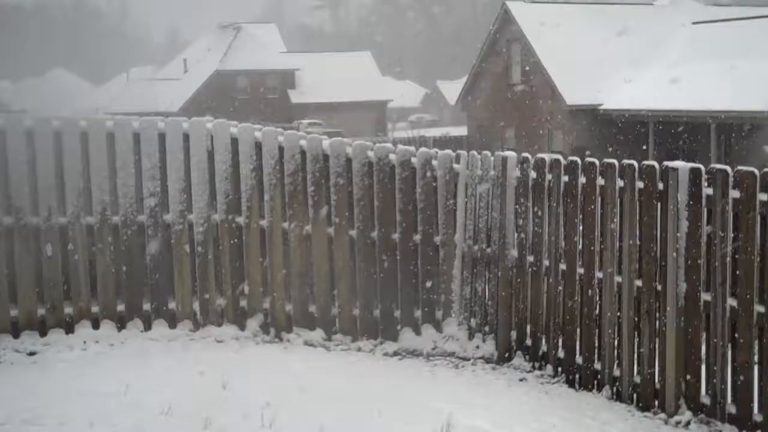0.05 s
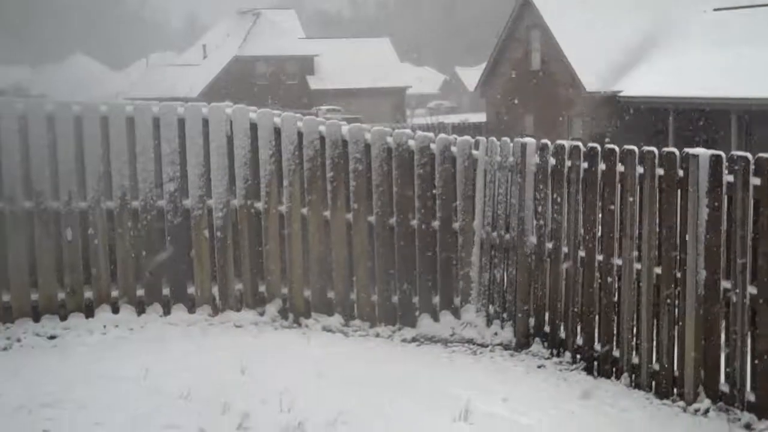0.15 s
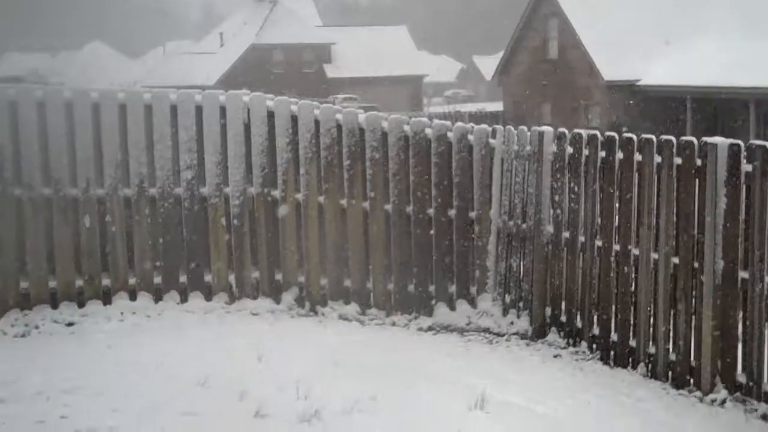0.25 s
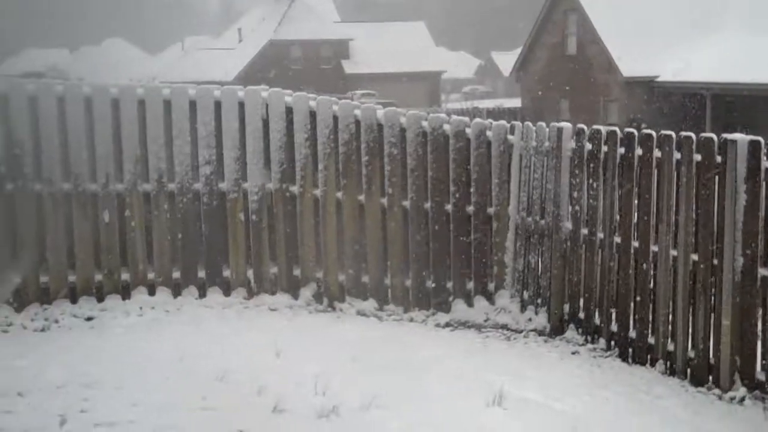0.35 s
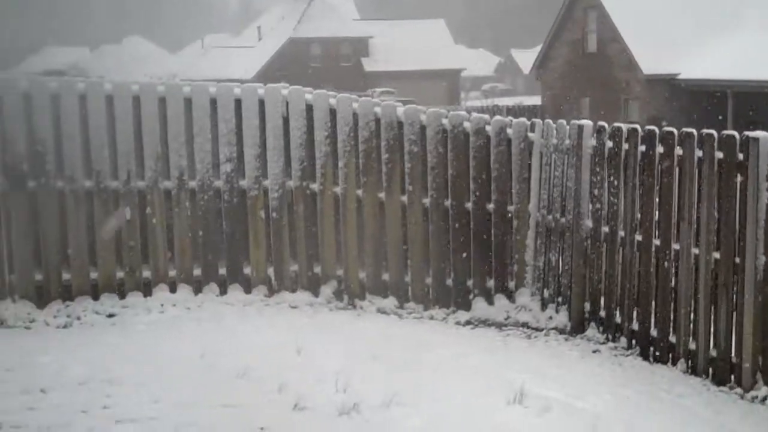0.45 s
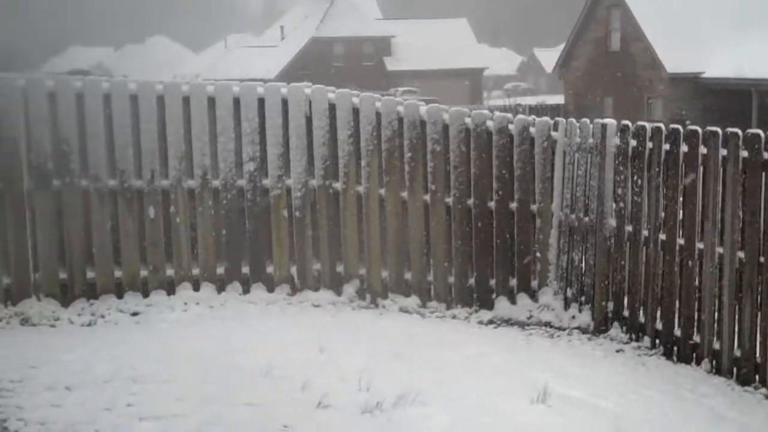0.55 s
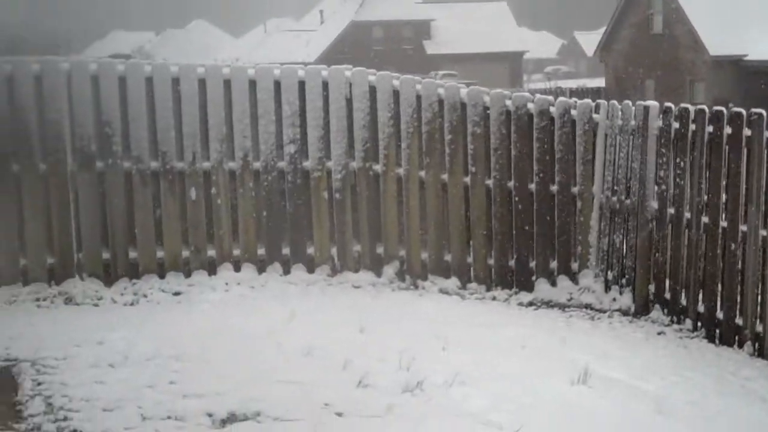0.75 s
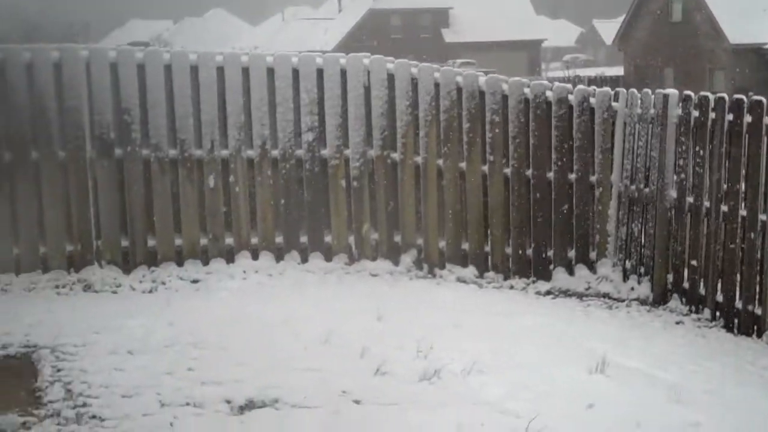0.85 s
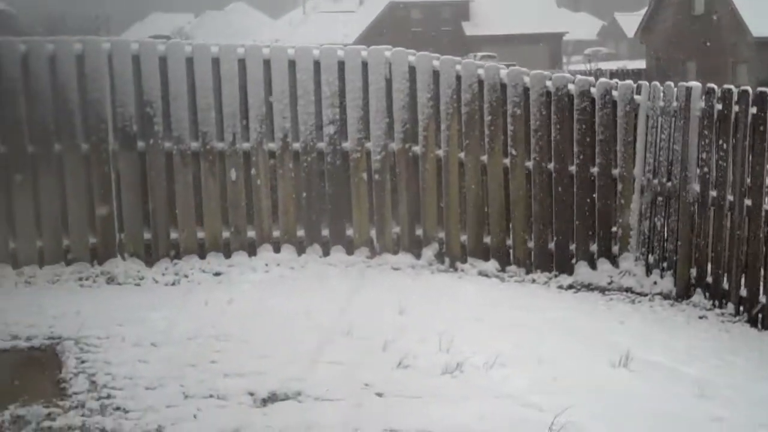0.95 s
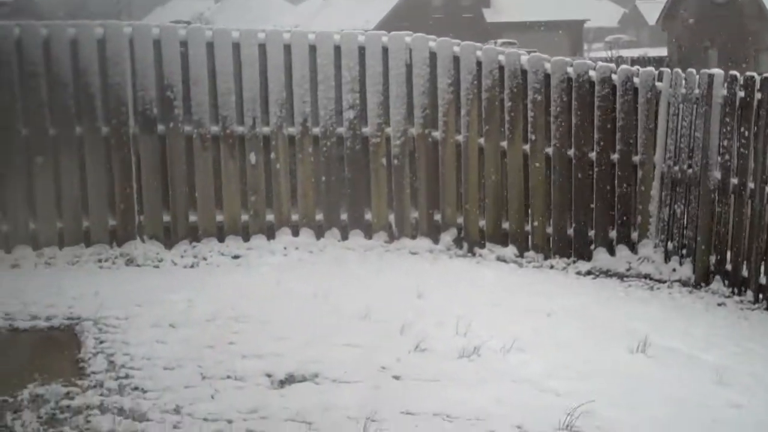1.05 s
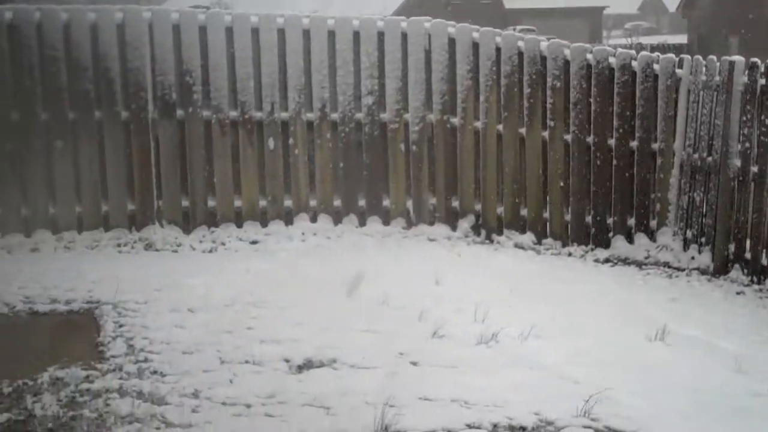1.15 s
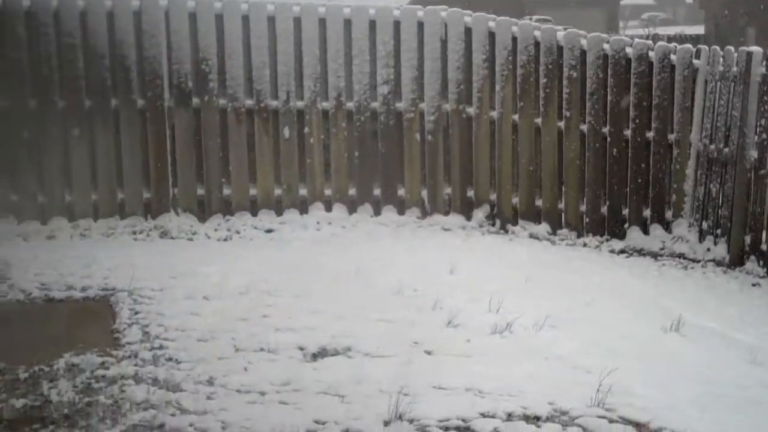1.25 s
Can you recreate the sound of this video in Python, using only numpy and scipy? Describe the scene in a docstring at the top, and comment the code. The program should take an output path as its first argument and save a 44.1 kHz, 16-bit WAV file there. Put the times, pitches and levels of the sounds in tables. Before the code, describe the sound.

Gusty wind buffets the microphone with an uneven low rumble over a faint outdoor hiss.

```python
"""Gusty wind buffets the microphone of a hand-held camera in a snowy yard.
Eddies roll over the port as a lumpy rumble that turns to a rough flutter as the gust grows;
soft ones thump the port and the sharpest slap it. Behind the wind sit a dull murmur of air,
a thin hiss, tiny ticks (probably snowflakes on the case), and faint rustles and one light
knock (probably the hand on the case)."""
import sys
import numpy as np
from scipy import signal
from scipy.fft import rfft, irfft, next_fast_len
from scipy.io import wavfile
from scipy.ndimage import uniform_filter1d, map_coordinates

SR = 44100
rng = np.random.default_rng(int(sys.argv[2]) if len(sys.argv) > 2 else 0)


def inscribe(sig):
    """Save sig as 16-bit PCM at rate SR to the path in sys.argv[1].

    A 1-D sig is mono; a 2-D sig holds one channel per row.
    Samples are clipped to [-1, 1] before scaling.
    """
    pcm = np.round(np.clip(np.atleast_2d(sig).T, -1, 1) * 32767)
    wavfile.write(sys.argv[1], SR, pcm.astype(np.int16))


N = 57330  # 1.3 s


def amp(db):
    """Decibels to gain."""
    return 10 ** (np.asarray(db) / 20)


def unit(x):
    """Scale to rms 1."""
    return x / np.sqrt(np.mean(x ** 2) + 1e-20)


def along(points, hz):
    """Read a curve of (freq_hz, value) points on a log frequency axis."""
    freqs, values = np.transpose(points)
    return np.interp(np.log(hz + 1), np.log(freqs + 1), values)


def wobble(rate):
    """A smooth random curve with `rate` knots a second."""
    return map_coordinates(rng.standard_normal(4096), [np.arange(N) * rate / SR], mode="wrap")


def filtered(x, response):
    """Equalise x with a gain given as a function of frequency."""
    size = next_fast_len(N + SR // 2)
    return irfft(rfft(x, size) * response(np.fft.rfftfreq(size, 1 / SR)), size)[:N]


def noise(spectrum):
    """Coloured noise of rms 1."""
    return unit(filtered(rng.standard_normal(N), lambda hz: amp(along(spectrum, hz))))


def low_pass(x, hz):
    """Roll off the treble at 18 dB an octave."""
    return signal.lfilter(*signal.butter(3, hz, fs=SR), x)


def impulse(spectrum, size=2048):
    """The minimum-phase click that has this spectrum."""
    cepstrum = irfft(np.log(amp(along(spectrum, np.fft.rfftfreq(size, 1 / SR)))))
    cepstrum[1:size // 2] *= 2
    cepstrum[size // 2 + 1:] = 0
    return irfft(np.exp(rfft(cepstrum)))


def add(track, start_s, sound, peak_db):
    """Mix a sound in at start_s, peaking at peak_db."""
    part = track[max(round(start_s * SR), 0):][:len(sound)]
    part += amp(peak_db) * sound[:len(part)] / np.abs(sound).max()


def yard(air_db=-58, hiss_db=-69, waver_db=1):
    """The bed: quiet distant air under a thin, slightly wavering hiss."""
    # dull murmur of outdoor air: freq_hz, level_db
    air_spectrum = [(15, -36), (25, -15), (32, 4), (81, 0.5), (408, -1.5), (948, -1), (1320, -5.5),
                    (1420, -8.5), (1560, -5), (1690, -5.5), (1830, -9.5), (5000, -27.5), (6500, -27.5),
                    (11000, -120)]
    # thin hiss: freq_hz, level_db
    hiss_spectrum = [(200, -7), (3000, 5), (6000, -2), (10000, 2), (13500, -5.5), (15000, -8)]
    air = amp(air_db) * noise(air_spectrum)
    hiss = amp(hiss_db + waver_db * wobble(rate=16.7)) * noise(hiss_spectrum)
    return air + hiss


def rustles(grain_db=3):
    """Brief grainy swells of treble, probably the hand on the case."""
    # faint swells: centre_s, level_db, half_width_s
    swells = [(0.407, -69.5, 0.026), (.53, -68, 0.076), (0.822, -65.5, 0.02), (.865, -75, 0.014),
              (1.186, -63.5, 0.019), (1.28, -69.5, 0.041)]
    # bright rustle tone: freq_hz, level_db
    spectrum = [(500, -8), (3000, -5), (7000, -1.5), (12000, -4), (15000, -12)]
    t = np.arange(N) / SR
    envelope = sum(amp(level_db) * np.exp(-((t - centre_s) / half_width_s) ** 2)
                   for centre_s, level_db, half_width_s in swells)
    grain = amp(grain_db * wobble(rate=700))
    return envelope * unit(grain * noise(spectrum))


def flakes(decay_s=0.001, trim_db=8):
    """Tiny dry ticks, probably snowflakes landing on the case."""
    # ticks: start_s, peak_db (before trim)
    ticks = [(.316, -59), (0.356, -56.5), (.401, -52.5), (0.447, -51), (.483, -51), (.514, -49.5),
             (0.519, -52.5), (.547, -50), (0.553, -50.5), (.626, -54), (.721, -60), (.86, -56), (.869, -55),
             (0.908, -55), (0.933, -51)]
    # crisp tick tone: freq_hz, level_db
    spectrum = [(500, -32), (3000, -1.5), (7000, -2.5), (11000, 5), (14000, 0.5)]
    out, click = np.zeros(N), impulse(spectrum)
    t = np.arange(SR // 100) / SR
    for start_s, peak_db in ticks:
        burst = rng.standard_normal(len(t)) * np.exp(-t / decay_s)
        add(out, start_s, signal.fftconvolve(burst, click), peak_db + trim_db)
    return out


def knock(start_s=0.9312, peak_db=-31):
    """One light, dead knock, probably a finger on the case."""
    # damped resonances of the case: pitch_hz, level_db, t60_s
    modes = [(770, -11, 0.0083), (1230, 11.5, 0.011), (1620, -4, 0.031)]
    out = np.zeros(N)
    t = np.arange(SR // 25) / SR
    ring = sum(amp(level_db - 60 * t / t60_s) * np.sin(2 * np.pi * pitch_hz * t)
               for pitch_hz, level_db, t60_s in modes)
    add(out, start_s, low_pass(ring, hz=1700), peak_db)
    return out


def puffs(half_width_cycles=1.0, trim_db=-1.5):
    """Each soft eddy thumps the port, swinging the pressure back and forth once or twice."""
    # soft eddies: centre_s, peak_db (before trim), pitch_hz
    eddies = [(.14, -36, 186), (0.176, -33.5, 181), (0.288, -20, 270), (.312, -18.5, 173), (.325, -17, 312),
              (.34, -23.5, 294), (0.398, -18, 313), (0.533, -25, 188), (.553, -29.5, 384),
              (0.564, -21.5, 222), (0.636, -29.5, 165), (0.691, -24.5, 154), (.76, -19.5, 540),
              (.777, -25, 456), (.795, -26.5, 430), (.81, -21.5, 385), (.862, -33, 480), (0.867, -30, 330),
              (.895, -30.5, 513), (.953, -33.5, 335), (1.001, -36, 270), (1.012, -30, 302),
              (1.12, -36.5, 410), (1.17, -33, 424), (1.278, -29.5, 153)]
    out = np.zeros(N)
    t = np.arange(-SR // 40, SR // 40) / SR
    for centre_s, peak_db, pitch_hz in eddies:
        swing = np.sin(2 * np.pi * (pitch_hz * t + rng.random()))
        envelope = np.exp(-(pitch_hz * t / half_width_cycles) ** 2)
        add(out, centre_s + t[0], swing * envelope, peak_db + trim_db)
    return out


def slaps(band_ratio=7, trim_db=-2):
    """Each sharp eddy slaps the port: one pressure jolt in a few milliseconds of tearing air."""
    # sharp eddies: centre_s, peak_db (before trim), half_width_s, upper_edge_hz
    eddies = [(.226, -29, 0.0017, 1970), (0.268, -20, 0.0039, 2540), (0.277, -22, 0.0019, 2130),
              (.286, -17.5, 0.003, 5200), (0.296, -14, 0.0011, 1620), (0.307, -23, 0.0023, 2580),
              (0.317, -22.5, 0.01, 2180), (.336, -21.5, 0.0026, 2260), (0.356, -20, 0.0028, 1780),
              (0.414, -16.5, .005, 2560), (0.429, -23, 0.0021, 2700), (.452, -18, 0.0054, 2780),
              (0.474, -21, 0.0013, 1400), (0.5, -35, 0.0014, 1400), (0.528, -29, 0.0011, 1100),
              (0.546, -19.5, .0025, 1400), (.552, -22.5, 0.0055, 1420), (0.557, -16.5, 0.00096, 4860),
              (.562, -25, 0.00074, 3840), (0.567, -24, 0.0015, 1990), (0.639, -25, 0.0073, 1710),
              (0.675, -27, 0.0057, 1290), (0.697, -22, 0.0023, 1080), (0.721, -27, 0.0063, 1120),
              (0.737, -27, 0.0043, 1500), (0.767, -25.5, 0.0094, 1500), (0.795, -25, 0.0025, 1450),
              (0.813, -26.5, 0.0024, 1780), (0.894, -31.5, 0.0022, 1190), (0.933, -31.5, 0.0006, 2700)]
    # slap tone ahead of each eddy's own band filter: freq_hz, level_db
    spectrum = [(30, -43), (120, -6), (450, 6), (1200, 1.5), (1800, -5.5), (2500, -8.5), (3400, -18),
                (4500, -32), (9000, -44)]
    out, click = np.zeros(N), impulse(spectrum)
    t = np.arange(-SR // 50, SR // 50) / SR
    for centre_s, peak_db, half_width_s, upper_edge_hz in eddies:
        tear = rng.standard_normal(len(t)) * np.exp(-(t / half_width_s) ** 2)
        jolt = (t == 0) * rng.choice([-1, 1])
        slap = signal.fftconvolve(0.5 * jolt + tear / np.linalg.norm(tear), click)
        # both band edges move together: small eddies reach higher and carry less bass
        low_cut = signal.butter(2, upper_edge_hz / band_ratio, "highpass", fs=SR)
        slap = low_pass(signal.lfilter(*low_cut, slap), upper_edge_hz)
        add(out, centre_s + t[0], slap, peak_db + trim_db)
    return out


def turbulence(spectrum, window_samples=700):
    """Coloured noise levelled so that its strength is even from one eddy to the next."""
    raw = noise(spectrum)
    power = uniform_filter1d(uniform_filter1d(raw ** 2, window_samples), window_samples // 2)
    return raw / np.sqrt(np.abs(power) + 1e-9)


def buffeting(full_gust_db=-31.5):
    """One gust drives three layers; the higher ones grow faster with it and come in sharper lumps."""
    # wind pressure on the port: time_s, level_db (counted from full_gust_db)
    gust = [(0, -73), (.129, -75.5), (.137, -46), (0.164, -40.5), (0.197, -51), (0.237, -35),
            (0.259, -29.5), (.272, -28.5), (.315, -25.5), (.346, -30.5), (.405, -28.5), (.44, -31),
            (.488, -34.5), (.52, -43), (0.543, -36.5), (0.559, -26.5), (.585, -32), (.66, -37), (.70, -33),
            (.76, -32.5), (.812, -36.5), (0.836, -39), (0.867, -40), (.878, -50), (.908, -39), (0.956, -45),
            (.975, -67), (1.011, -40), (1.039, -61.5), (1.106, -54), (1.12, -44.5), (1.14, -52.5),
            (1.169, -43), (1.205, -61), (1.245, -47), (1.266, -55), (1.279, -37.5), (1.3, -61)]
    # tilt of the roar from bass to mids as the eddies get smaller: time_s, tilt_db
    tilt = [(0, -2), (.15, -1.5), (.28, 1.5), (.33, -3.5), (.42, 0.5), (.52, -4), (.6, -1), (.68, -2),
            (.755, 4), (.81, -1), (.87, 1), (1.01, 1.5), (1.17, -1.5), (1.28, -0.5)]
    # low rumble: freq_hz, level_db
    rumble_spectrum = [(20, -52), (45, -22.5), (65, -8.5), (110, -4.5), (160, -1), (250, -1.5),
                       (400, -12.5), (800, -35), (2000, -78)]
    # low-mid body of the roar: freq_hz, level_db
    body_spectrum = [(40, -55), (130, -14.5), (230, -5), (330, -1), (500, -3), (850, -12), (1300, -20),
                     (2200, -54), (4000, -81)]
    # rough midrange flutter: freq_hz, level_db
    flutter_spectrum = [(100, -28), (400, -2.5), (900, 2.5), (1400, -3), (2000, -8.5), (3000, -26),
                        (4200, -35.5), (8000, -45)]
    t = np.arange(N) / SR
    gust_db = np.interp(t, *np.transpose(gust)) - full_gust_db
    tilt_db = np.interp(t, *np.transpose(tilt))
    eddies = wobble(rate=110)  # shared, so the layers lurch together

    def layer(spectrum, base_db, growth, lumpy_db, rough_db):
        lumps = unit(amp(lumpy_db * eddies + rough_db * wobble(rate=350)))
        return amp(base_db + growth * gust_db) * lumps * turbulence(spectrum)

    rumble = layer(rumble_spectrum, base_db=-35.0, growth=0.74, lumpy_db=0.5, rough_db=1)
    body = layer(body_spectrum, base_db=-34.0, growth=0.98, lumpy_db=1.5, rough_db=1.5)
    flutter = layer(flutter_spectrum, base_db=-45.5, growth=1.6, lumpy_db=2.0, rough_db=3)
    return amp(-tilt_db / 2) * rumble + amp(tilt_db) * body + amp(tilt_db / 2) * flutter


def scene():
    """Wind at the port over small case noises and the quiet yard, in mono."""
    wind = buffeting() + slaps() + puffs()
    return (wind + knock() + flakes() + rustles() + yard())[None]


def record(dry):
    """The camera keeps nothing above its band limit."""
    band_limit_hz = 14200
    return filtered(dry[0], lambda hz: hz < band_limit_hz)[None]


dry = scene()
out = record(dry)
inscribe(out)
```